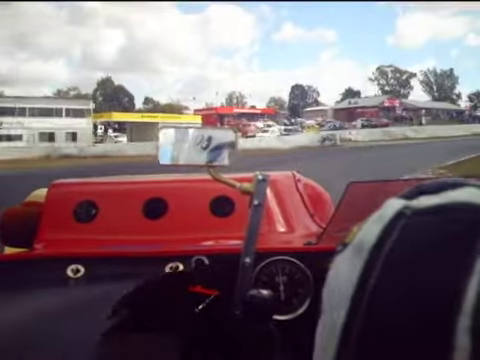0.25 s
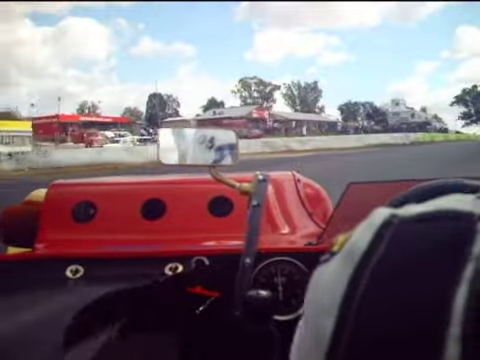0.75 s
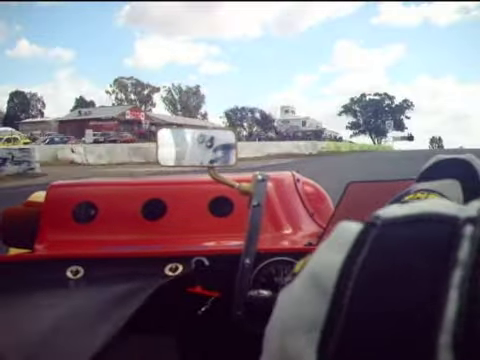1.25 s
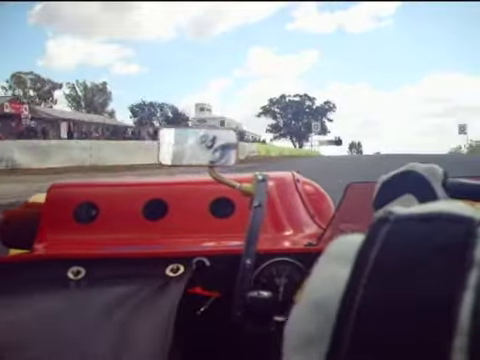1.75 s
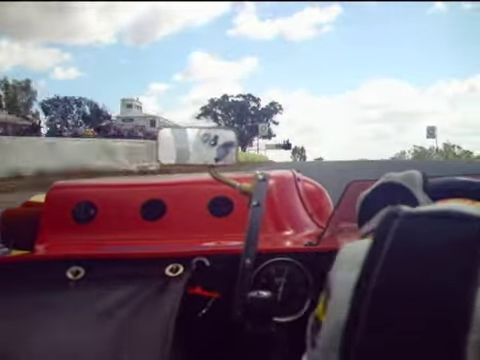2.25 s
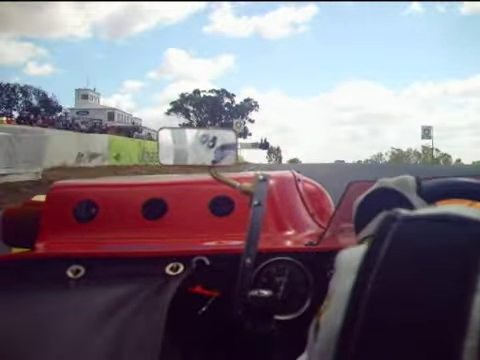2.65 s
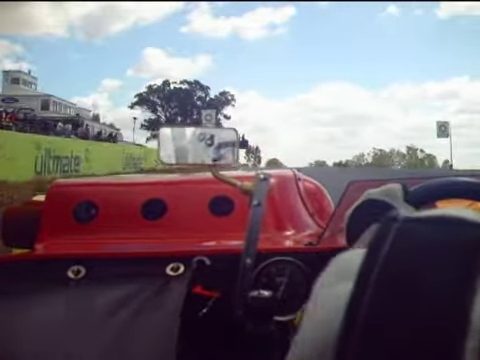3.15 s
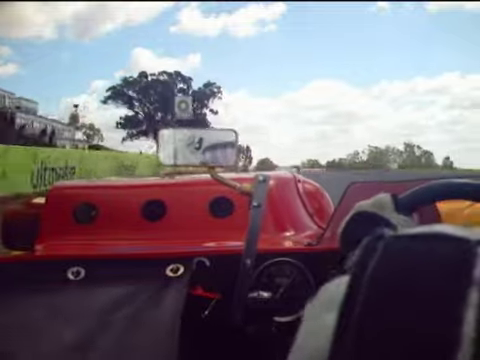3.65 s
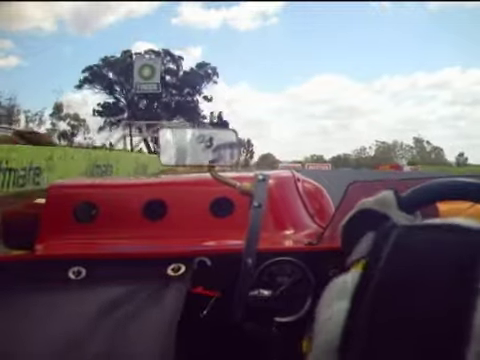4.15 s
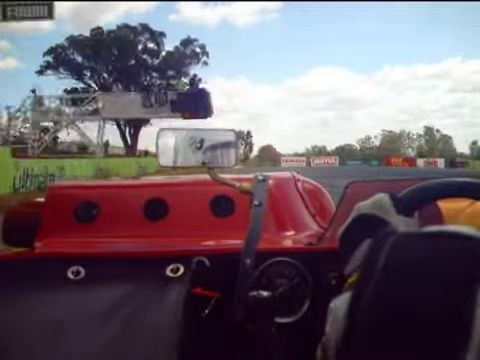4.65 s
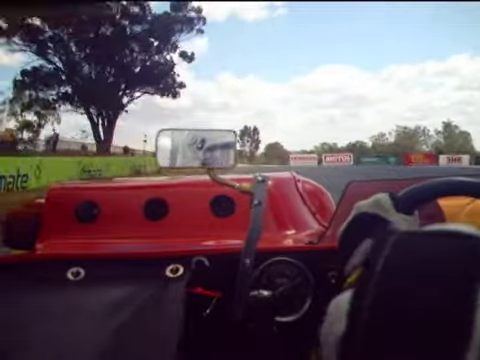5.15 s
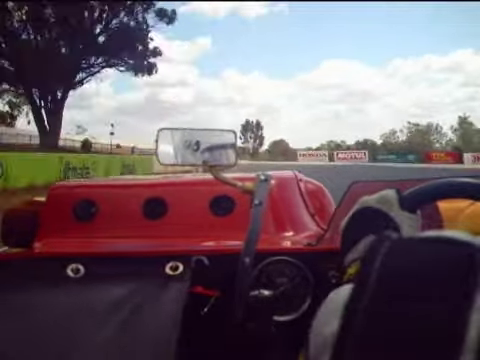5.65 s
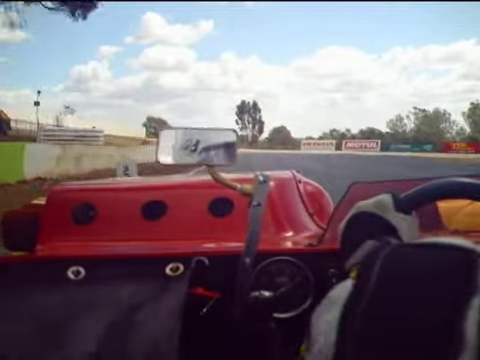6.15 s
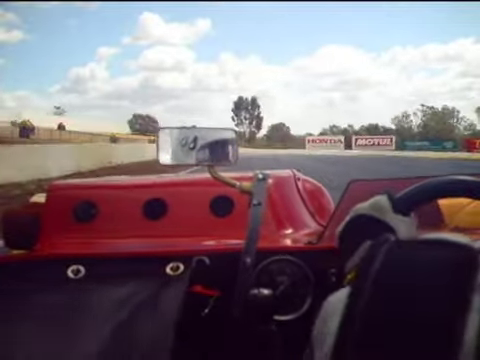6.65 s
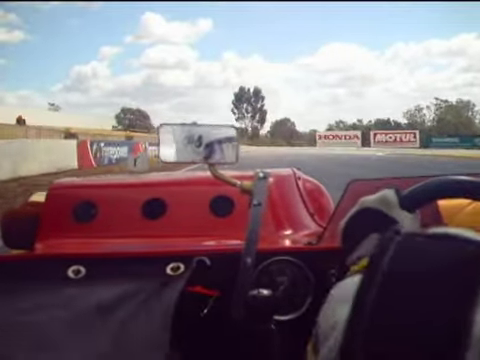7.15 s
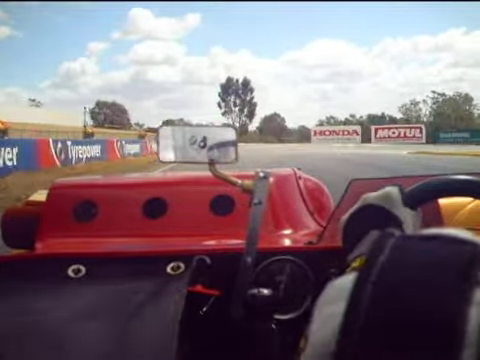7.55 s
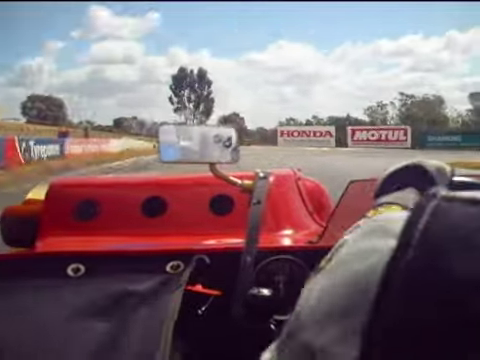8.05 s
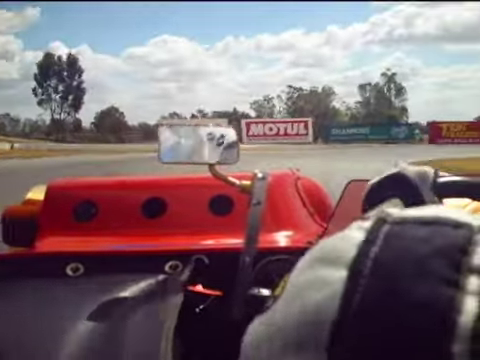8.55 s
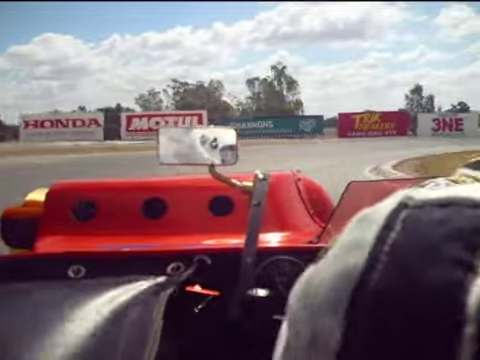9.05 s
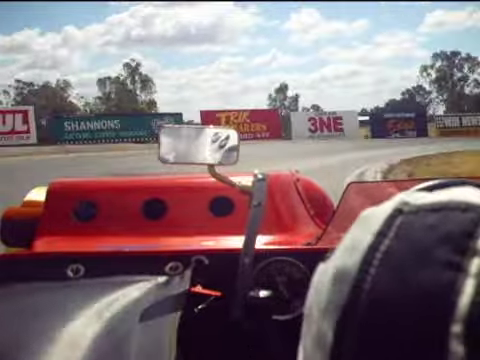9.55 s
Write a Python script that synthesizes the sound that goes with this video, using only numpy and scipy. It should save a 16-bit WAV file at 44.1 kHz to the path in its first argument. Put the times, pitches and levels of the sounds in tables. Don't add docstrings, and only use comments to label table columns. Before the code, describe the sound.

A camera bolted in an open racing cockpit hears a low four-cylinder drone climbing steadily through one gear, with constant buzzing rattle, chassis thuds and wind buffet. The drone swells until it cracks and snaps with overload. The throttle shuts, the note stumbles and sinks, rough brake squeals break out, and the engine pulls again at low speed. Dry, dull, close sound with no echo.

```python
import sys
import numpy as np
from scipy import signal
from scipy.fft import rfft, irfft, next_fast_len
from scipy.io import wavfile
from scipy.ndimage import uniform_filter1d, map_coordinates

SR = 44100
rng = np.random.default_rng(int(sys.argv[2]) if len(sys.argv) > 2 else 0)


def pcm_store(signal):
    levels = np.round(np.clip(np.atleast_2d(signal), -1, 1) * 32767)
    wavfile.write(sys.argv[1], SR, levels.astype(np.int16).T)


def undo_db(level):
    steps = np.asarray(level, float) / 20
    return 10 ** steps


N = 431738


# (t/s, level/dB)
FIRING_LEVEL = [(0, -24.5), (.9, -26.5), (1.5, -24.5), (2.7, -29), (3.3, -25.5), (4.3, -11.5), (4.6, -9),
                (5.1, -9), (5.5, -13), (6.15, -6.5), (6.45, -8.5), (6.8, -18), (7.1, -20.5), (7.4, -30),
                (7.7, -21), (8.1, -20.5), (8.6, -16), (9.79, -18.5)]
# (t/s, half length/s, level/dB)
STUMBLES = [
    (5.88, 0.022, -0.5),
    (5.98, .015, -3),
    (6.377, .02, -3.5),
    (6.62, 0.022, -6.5),
    (6.678, .025, 3),
    (6.745, .025, -9.5),
]
SIDE_TONE = -62, [(234, 5, 19)], -60, [(238.2, 11, 31)]


def firing_tone(turns, shake):
    firing = hum(turns + .012 * walk(25), 1.2, 10) * (1 + 0.11 * shake)
    side = hum(1.83 * turns, 3.6, 9)
    firing_db = curves(FIRING_LEVEL)[0] + bump(np.arange(N) / SR, STUMBLES)
    return undo_db(firing_db) * firing + undo_db(response(SIDE_TONE)) * side


HALF_TONE = -39.5, [(243.5, 13, 17), (191.6, 7, 3.5), (223.4, 9, 8.5)], -37.5, [(228, 10, 5)]
DOUBLE_TONE = -49, [(194.2, 11, 8), (224, 6.7, 7), (243, 6, 7.7), (163, 8.6, 11)], -52.5, [(232, 20, 9.4)]
TRIPLE_TONE = -54.5, [(192, 5, 14.8), (214, 4, 14), (243.6, 6, 13)], -55, []


def crank_tones(turns):
    half = undo_db(response(HALF_TONE)) * hum(turns / 2, 0.79, 8.8)
    double = undo_db(response(DOUBLE_TONE)) * hum(2 * turns, 3.5, 6)
    triple = undo_db(response(TRIPLE_TONE)) * hum(3 * turns, 3.3, 6)
    return half + double + triple


CLATTER_LEVEL = -48, [(194.6, 12, 7), (231.4, 29.2, 11), (163, 10, -4.5)], -57.5, [(239, 32, 15)]
# (f/Hz, level/dB)
BODY_COLOUR = [(90, -7.5), (125, 1.5), (260, -2), (450, -6.5), (620, -8.5), (820, -9.5), (1030, -8),
               (1400, -7), (2100, -12.5), (2600, -7), (3000, -13.5), (3200, -24), (4000, -31.5)]


def valve_clatter(turns, size=256, count=16):
    patterns = rng.standard_normal((count, size))
    place = [np.linspace(0, count - 1, N), turns / 4 % 1 * size]
    pattern = map_coordinates(patterns, place, order=1, mode="grid-wrap")
    return undo_db(response(CLATTER_LEVEL) + 8) * level(colour(pattern, BODY_COLOUR))


MOUNT_LEVEL = -32.5, [(185, 5, -4), (163, 10, 6), (197, 5, -3)], -30.5, []
BEATS = [1.245, 1.415]


def mount_ring(turns):
    beats = sum(hum(order * turns, 2.5, 4) for order in BEATS)
    shocks = rng.standard_normal(N) + undo_db(-25.5) * beats
    return undo_db(response(MOUNT_LEVEL)) * ring(shocks, [(237.4, 23, 1.5), (267, 67, -9.5)])


SHAFT_LEVEL = -32, [(234, 11, -15.5)], -33, [(237, 11, -6), (163, 6, -5.5)]
# (multiple of firing rate, level/dB)
SHAFT_TONES = [(.415, 0), (.83, -7)]


def prop_shaft(turns):
    return undo_db(response(SHAFT_LEVEL)) * sum(undo_db(db) * hum(order * turns, 2, 4) for order, db in SHAFT_TONES)


GEAR_LEVEL = -44, [(243, 10, -4.5), (160, 11, -20.5), (191, 4, 3)], -61.5, [(222, 35, 20)]
TIMING_LEVEL = -67.5, [(211.7, 11, 23)], -70, []
# (multiple of firing rate, level/dB)
GEAR_TONES = [(8.75, 0), (9.5, -6)]


def gear_whine(turns):
    gears = 0
    for order, db in GEAR_TONES:
        gears = gears + undo_db(db) * hum(order * (turns + 0.0044 * walk(30)), 4, 5)
    timing = undo_db(response(TIMING_LEVEL)) * hum(19 * turns, 2, 15)
    return undo_db(response(GEAR_LEVEL) + 2.0) * gears + timing


HIGH_RATTLE = -29, [(172.2, 25, -6.5), (207.7, 4.6, -2.5), (212, 3, 2)], -28.5, [(180, 27, -3.5)]
LOW_RATTLE = -35, [(163, 10, -5.5), (240, 13, 2), (184, 5, -1)], -34.5, [(165, 32, -4), (230, 8.7, 1.5),
              (210, 8, -2.5)]
# (f/Hz, width/Hz, level/dB)
HIGH_RING = [(2380, 240, -5), (2550, 170, -3.5), (2730, 150, 0), (2930, 130, -3.5), (3270, 240, -16),
             (3600, 300, -20), (3990, 260, -18)]
LOW_RING = [(1037, 120, -3), (1236, 180, -5.5), (1474, 220, -1.5), (1673, 220, -0.5), (1930, 240, -2)]
# (t/s, level over the rattle/dB, decay/s)
KNOCKS = [
    (.095, 12.5, 0.0082),
]
# (t/s, half length/s, level/dB)
JUDDERS = [
    (7.776, .035, -9.5),
    (8, .02, -3.5),
    (8.091, 0.032, 3.5),
    (8.165, .035, -7),
    (8.309, .022, -6.5),
]


def rattle(turns):
    times = np.arange(N) / SR
    chance = rng.random((3, N))
    bunch = .4 + np.exp(-(turns % 1) / .3)
    happens = chance[0] < 3000 / SR * bunch
    strength = (1 - chance[2]) ** -.14
    taps = happens * np.sign(chance[1] - .5) * strength
    for s, db, decay_s in KNOCKS:
        since = times - s
        taps = taps * (1 + undo_db(db) * (since > 0) * np.exp(-np.abs(since) / decay_s))
    taps = taps * undo_db(0.94 * walk(60) + bump(times, JUDDERS))
    high = undo_db(response(HIGH_RATTLE)) * ring(taps, HIGH_RING)
    low = undo_db(response(LOW_RATTLE) + 0.56 * walk(12)) * ring(taps, LOW_RING)
    return high + low


# (t/s, length/s, f/Hz, pitch sag/Hz per s, level/dB)
SQUEALS = [
    (7.845, .13, 1660, 250, -35),
    (8.025, .105, 1720, 6002, -35.5),
    (8.21, .065, 1680, 100, -29.5),
    (8.345, 0.097, 1600, 52, -33.5),
    (8.46, 0.61, 1600, 140, -39),
    (8.345, .7, 2720, -250, -31.5),
    (7.845, .28, 2750, 50, -35),
    (8.21, 0.075, 2750, 46, -34.5),
]


def squeal(width_hz=260, edge_s=.015):
    out = 0
    rough_sine, rough_cosine = walk(width_hz), walk(width_hz)
    for s, length_s, hz, sag, db in SQUEALS:
        since = np.arange(N) / SR - s
        angle = 2 * np.pi * (hz - sag * since / 2) * since
        grip = np.clip(np.minimum(since, length_s - since) / edge_s + .5, 0, 1) ** 2
        out = out + undo_db(db) * grip * (rough_sine * np.sin(angle) + rough_cosine * np.cos(angle))
    return out


# (t/s, level on the chassis thud/dB)
BUMPS = [
    (1.8, 4),
    (2.25, 4),
    (3.02, 5),
    (4.2, 3.3),
    (5.55, 1.4),
    (6, 2),
    (6.8, 2),
    (7.3, 7),
    (8.55, 4.8),
]


def chassis_thud(rate, shake, bump_s=0.17):
    bumps_db = bump(np.arange(N) / SR, [(s, bump_s, db) for s, db in BUMPS])
    return undo_db(-29 + 0.0737 * (rate - 200) + bumps_db) * shake


RUSH_LEVEL = -40, [(188, 22, -4), (163, 10, -3)], -40, [(177, 27, -5.5)]
# (f/Hz, level/dB)
BUFFET_COLOUR = [(15, -6), (60, -3.5), (130, -5), (200, -6.5), (270, -5), (320, -17), (450, -26)]
RUSH_COLOUR = [(280, -8.5), (450, 1), (620, -1), (850, -8.5), (1200, -7), (2000, -8), (3000, -8),
               (3300, -15), (4300, -25.5)]


def wind(rate):
    gusts = rng.standard_normal(N) * undo_db(1.5 * walk(8.3))
    buffet = level(colour(gusts, BUFFET_COLOUR), 1.8)
    flutter = rng.standard_normal(N) * undo_db(.8 * walk(12) + 1.2 * walk(70))
    rush = level(colour(flutter, RUSH_COLOUR), 5)
    buffet_db = -29 + 0.0483 * (rate - 200)
    return undo_db(buffet_db) * buffet + undo_db(response(RUSH_LEVEL)) * rush


def level(x, db=0):
    return x * undo_db(db) / np.sqrt(np.mean(x ** 2))


def curves(table):
    s, *columns = np.transpose(table)
    return [np.interp(np.arange(N) / SR, s, c) for c in columns]


def shaped(x, gain):
    size = next_fast_len(N, real=True)
    hz = np.arange(size // 2 + 1) * SR / size + 1
    return irfft(rfft(x, size) * gain(hz), size)[:N]


def colour(x, points):
    hz, db = np.transpose(points)
    return shaped(x, lambda f: undo_db(np.interp(np.log(f), np.log(hz), db, right=-90)))


def ring(x, modes):
    def gain(f):
        power = 0
        for hz, width, db in modes:
            power = power + undo_db(2 * db) / (1 + ((f - hz ** 2 / f) / width) ** 2) ** 2
        return np.sqrt(power)
    return level(shaped(x, gain))


def walk(rate):
    k = int(SR / rate)
    steps = np.repeat(rng.standard_normal(N // k + 1), k)
    return 1.305 * uniform_filter1d(uniform_filter1d(steps, k), k)[:N]


def hum(turns, wander_db, rate):
    return np.sqrt(2) * np.sin(2 * np.pi * turns) * undo_db(wander_db * walk(rate))


def bump(x, rows):
    return sum(db * np.exp(-((x - centre) / width) ** 2) for centre, width, db in rows)


# (t/s, firing rate f/Hz)
SPEED = [(0, 183.4), (0.5, 183), (1.3, 191.1), (1.6, 193.3), (2.2, 200.5), (3.1, 213.9), (3.7, 222.2),
         (5.5, 244.9), (5.8, 244.3), (6.4, 232.9), (6.7, 225.3), (7, 220.9), (7.3, 214.1), (7.9, 189.1),
         (8.5, 169.1), (8.8, 161.0), (9.1, 162.3), (9.79, 163.1)]
# (t/s, opening 0-1)
THROTTLE = [
    (0, 1),
    (5.68, 1),
    (5.88, 0),
    (9.03, 0.01),
    (9.09, 0.77),
    (9.79, 0.9),
]


def response(part, step=64):
    rate = curves(SPEED)[0][::step]
    load = np.clip(curves(THROTTLE)[0][::step], 0, 1)
    pull_db, pulling, coast_db, coasting = part
    db = load * (pull_db + bump(rate, pulling)) + (1 - load) * (coast_db + bump(rate, coasting))
    return np.interp(np.arange(N), np.arange(0, N, step), db)


def scene():
    rate, = curves(SPEED)
    turns = np.cumsum(rate) / SR
    shake = ring(rng.standard_normal(N), [(33.1, 11, 0)])
    engine = firing_tone(turns, shake) + crank_tones(turns) + valve_clatter(turns) + mount_ring(turns)
    drive = prop_shaft(turns) + gear_whine(turns)
    return (engine + drive + rattle(turns) + squeal() + chassis_thud(rate, shake) + wind(rate))[None]


# (t/s, snap level/dB)
CRACKS = [(4.3597, -29), (4.44, -27), (4.5134, -23.5), (4.5175, -26), (4.5286, -35), (4.5371, -27),
          (4.5802, -50), (4.591, -29), (4.595, -25), (4.6316, -36), (4.6465, -23), (4.6657, -35),
          (4.717, -31), (4.7512, -23), (4.7702, -43), (4.7935, -38), (4.8506, -39), (4.9095, -26),
          (5.0125, -23), (5.0543, -25), (5.1025, -48), (5.983, -39), (6.0017, -23), (6.0306, -25),
          (6.1267, -25), (6.1557, -21), (6.2779, -23.5), (6.3382, -22), (6.3876, -36), (6.4021, -22)]
SWINGS = [5.92, 5.924, 5.9539, 6.0162, 6.0493, 6.0826, 6.0994, 6.1035, 6.1412, 6.2338, 6.2633, 6.2932]
# (t/s, number of crests, gap/s)
RUNS = [(5.8358, 4, .0075), (5.9158, 2, .0082), (5.9346, 4, .0045), (6.0411, 2, .0042), (6.0599, 4, .0028),
        (6.0788, 2, .014), (6.0951, 3, .0062), (6.1328, 2, .0123), (6.1665, 2, .0044), (6.1852, 3, .0075),
        (6.2127, 1, 0), (6.2256, 2, .0041), (6.289, 2, .0081), (6.3079, 4, .005)]


def losses():
    rows = [(s, 1, db > -24, db) for s, db in CRACKS]
    rows += [(s, 7, 0, -27) for s in SWINGS]
    for s, crests, gap_s in RUNS:
        for k, (a, b) in enumerate(rng.random((crests, 2))):
            snap_db = -20 + 3 * np.log(1 - b)
            rows.append((s + k * gap_s, 1 + (a < .2), 0, snap_db))
    return sorted(rows)


CONVERTER_HZ, FULL = 8000, .707


def overflow(slow, reach=9, swell=22, least=0.71, per_db=.007, knee=.8):
    over = np.maximum(np.abs(slow) / FULL - knee, 0)
    rounded = (1 - knee) * np.tanh(over / (1 - knee))
    out = slow - np.sign(slow) * FULL * (over - rounded)
    kept = np.ones(len(out))
    near = np.arange(-reach, reach + 1).astype(int)
    wide = np.arange(-50, 51)
    for s, lost, again, snap_db in losses():
        around = int(s * CONVERTER_HZ) + (near if lost < 2 else 2 * near)
        smooth = np.mean([out[around + k] for k in range(-2, 3)], axis=0)
        peak = np.argmax(np.abs(smooth) if lost < 2 else -smooth)
        target = (least + per_db * (snap_db + 49) + .025 * (lost - 1)) * FULL
        gain = target / abs(smooth[peak]) - 1
        out[around[peak] + wide] *= 1 + gain * np.exp(-(wide / swell) ** 2)
        first = around[peak] - int(lost) // 2
        kept[first:first + int(lost)] = 0
        kept[first + int(lost) + 2] *= 1 - again
    return np.clip(out, -FULL, FULL) * kept


def low_pass(x):
    return signal.sosfilt(signal.butter(12, 15900, fs=SR, output="sos"), x)


def record(dry):
    slow = overflow(signal.resample_poly(dry[0], 80, 441))
    smoother = signal.firwin(441 * 32 + 1, 1 / 441, window=("kaiser", 9))
    fast = signal.resample_poly(slow, 441, 80, window=smoother)
    return low_pass(np.clip(fast[None, :N], -FULL, FULL))


dry = scene()
out = record(dry)
pcm_store(out)
```